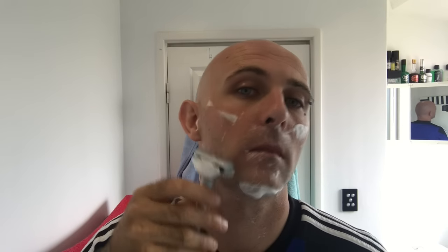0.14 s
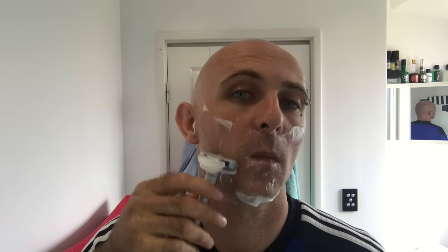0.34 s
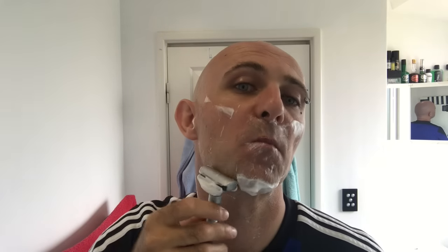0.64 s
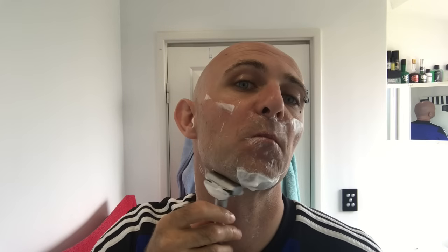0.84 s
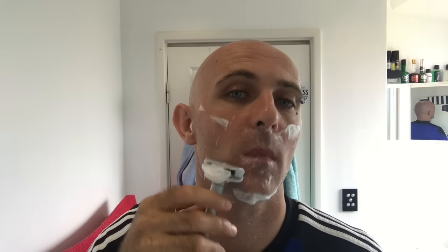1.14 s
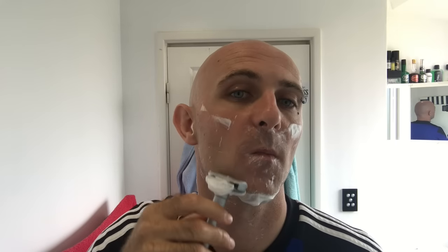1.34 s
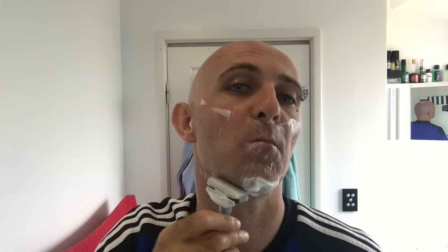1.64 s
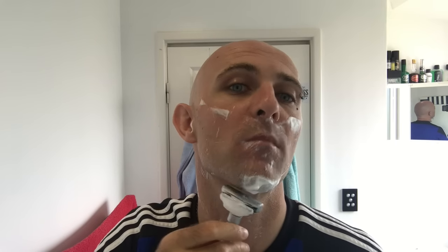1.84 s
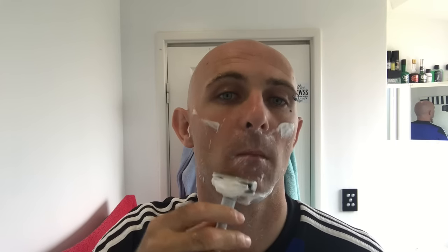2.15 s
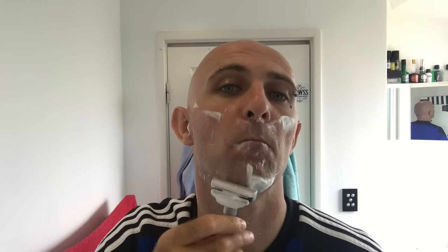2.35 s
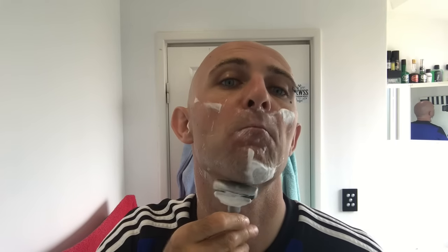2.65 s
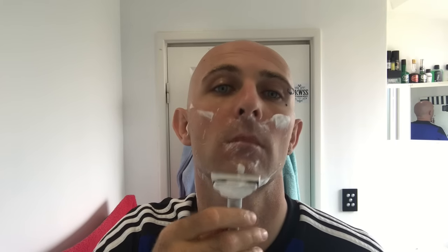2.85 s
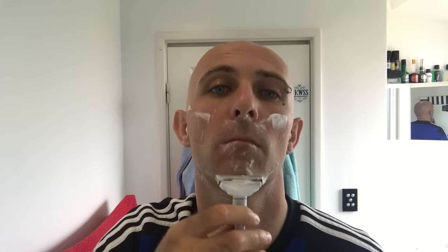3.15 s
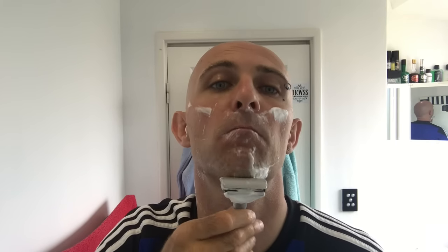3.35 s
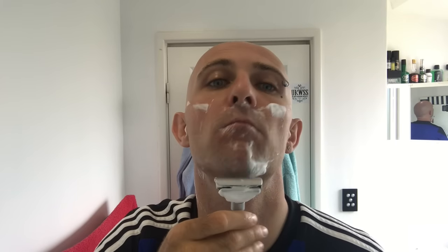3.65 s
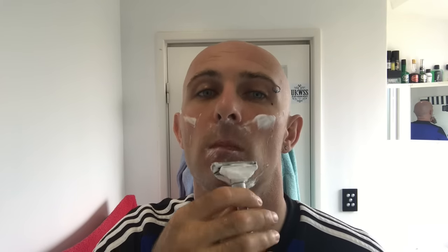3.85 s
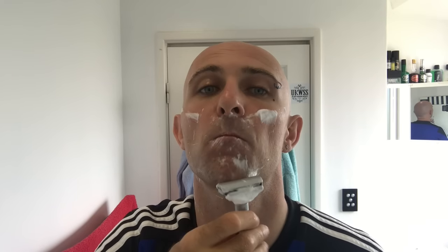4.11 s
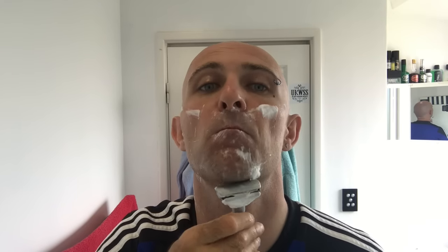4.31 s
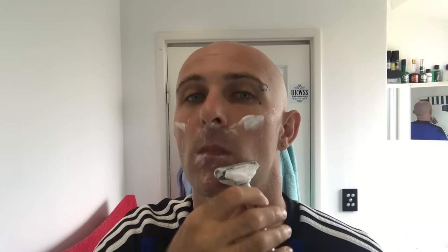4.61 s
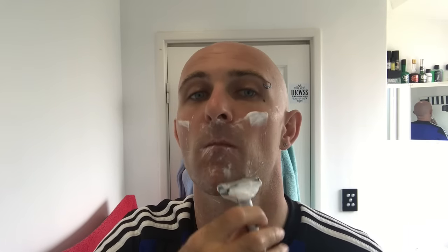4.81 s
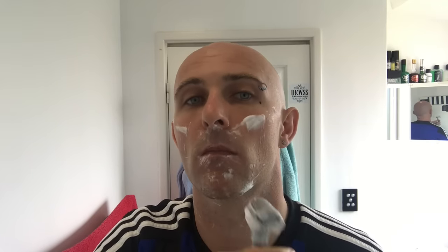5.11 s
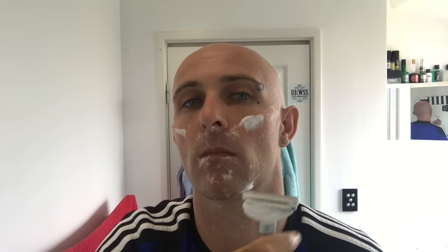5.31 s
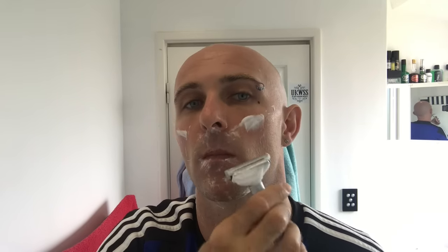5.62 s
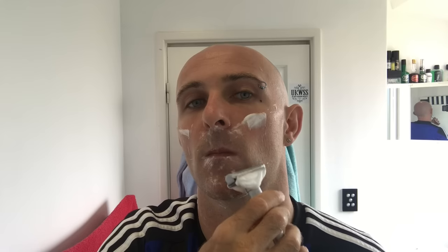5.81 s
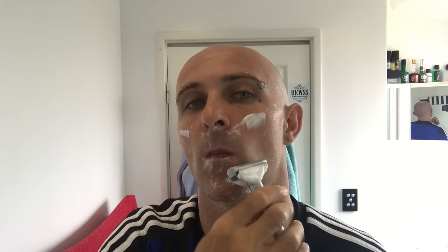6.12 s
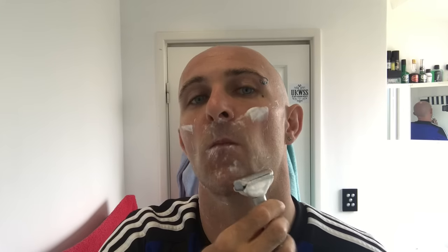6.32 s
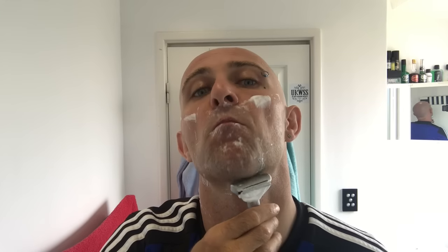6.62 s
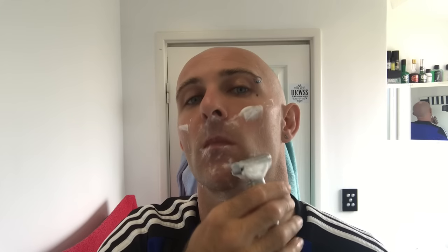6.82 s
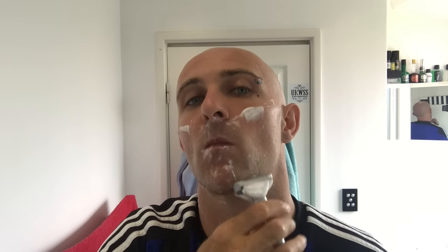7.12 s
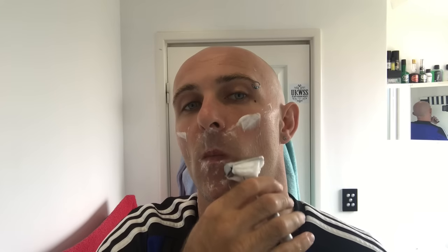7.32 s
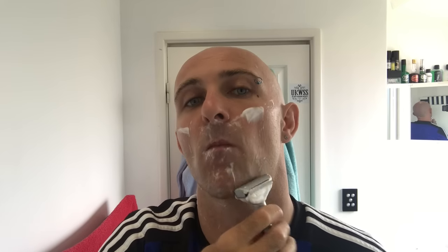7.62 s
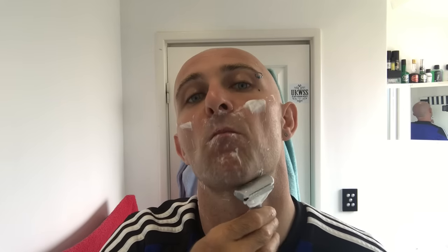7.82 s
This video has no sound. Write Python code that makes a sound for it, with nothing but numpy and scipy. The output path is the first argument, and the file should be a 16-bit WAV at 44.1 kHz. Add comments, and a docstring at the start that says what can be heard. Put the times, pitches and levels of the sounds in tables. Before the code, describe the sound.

A safety razor scrapes through lathered stubble, heard close up in a small room with a short echo. A faint low machine hum, rumble and airy hiss run throughout. Each stroke is a brief, high-pitched, scratchy rasp, with sharp little cracks where tough hairs give way. After a faint scrape at the start, strong crackling strokes come at about 0.7 and 1.5 seconds, a longer one from 2.3 to 2.7, a double one from 3.2 to 3.6, and others near 4.2 and 4.9. Tiny bright foam pops and dry clicks of the head touching or leaving the skin fall around the strokes. Near 5 seconds a soft low boom swells for half a second while the shaving pauses. Strokes return at about 6.0 and 6.5, with a short one at 7.1. The last runs from 7.6 to 7.9, with one brief metallic clink at about 7.7.

```python
"""A low machine hum fills a small room, and a safety razor starts to rasp through lathered stubble.
A man shaves in short strokes from jaw to chin: each hair snaps at the blade, rings the razor head and
thuds softly into the skin. Lather pops as the head lands and lifts, and tough hairs catch, then crack.
A low room mode swells once past the middle, and near the end the razor clinks."""
import sys
import numpy as np
from scipy import signal
from scipy.fft import rfft, irfft, next_fast_len
from scipy.io import wavfile
from scipy.ndimage import uniform_filter1d

SR = 44100
rng = np.random.default_rng(int(sys.argv[2]) if len(sys.argv) > 2 else 0)


def master_out(mix):
    """Clip the mix to full scale and print it as 16-bit PCM to the path in sys.argv[1]."""
    frames = np.transpose(np.atleast_2d(mix))
    ceiling = np.clip(frames, -1, 1)
    pcm = np.round(ceiling * 32767).astype(np.int16)
    wavfile.write(sys.argv[1], SR, pcm)


N = 351036
TIME = np.arange(N) / SR
TOP_HZ = 15780


def gain_of(db):
    """Decibels to amplitude."""
    return 10 ** (np.asarray(db) / 20)


def unit_rms(x):
    """Scales to rms 1."""
    return x / np.sqrt(np.mean(x ** 2) + 1e-20)


def curve_at(points, hz):
    """Reads a curve on a log-frequency axis."""
    f, value = np.transpose(points)
    return np.interp(np.log(hz + 1), np.log(f + 1), value)


def add(mix, s, sound):
    """Mixes a sound in at s seconds."""
    part = mix[max(round(s * SR), 0):][:len(sound)]
    part += sound[:len(part)]


def noise(gain):
    """Noise of rms 1, shaped by a gain that depends on frequency."""
    size = next_fast_len(N, True)
    spectrum = rfft(rng.standard_normal(size)) * gain(np.fft.rfftfreq(size, 1 / SR))
    return unit_rms(irfft(spectrum, size)[:N])


def wander(hz):
    """Smooth random modulation, rolling off above hz."""
    return noise(lambda f: 1 / (1 + (f / hz) ** 4))


def ring(gain, size=2048):
    """Minimum-phase click response of energy 1, from its spectrum."""
    log_gain = np.log(np.maximum(gain(abs(np.fft.fftfreq(size, 1 / SR))), 1e-5))
    response = np.fft.ifft(np.exp(np.conj(signal.hilbert(log_gain)))).real[:size // 2]
    return response / np.linalg.norm(response)


def bursts(events, trail, decay_s, per_s):
    """Each event is one click with a quickly dying trail of smaller ones."""
    clicks, t = np.zeros(N), np.arange(SR // 50) / SR
    for s, db in events:
        crackle = rng.choice([-1, 1], len(t)) * (rng.random(len(t)) < per_s / SR)
        burst = trail * crackle * np.exp(-t / decay_s)
        burst[0] = 1
        add(clicks, s, gain_of(db) * burst)
    return clicks


# Partials of the machine hum: f/Hz, rms level/dB
HUM_PARTIALS = [(45, -62.5), (89.7, -60), (179.5, -76.5), (207, -78.5)]


def machine_hum(waver=0.13, drift_rad=0.27):
    """A machine drones low, each partial wavering in level and phase."""
    hum = np.zeros(N)
    for hz, db in HUM_PARTIALS:
        level = 1 + waver * wander(0.98)
        phase = 2 * np.pi * hz * TIME + drift_rad * wander(0.46)
        hum += gain_of(db) * unit_rms(level * np.sin(phase))
    return hum


# EQ of the room's low rumble: f/Hz, relative level/dB
RUMBLE_EQ = [(15, -30), (28, -15), (36, -19), (52, -10), (66, -3.5), (84, -12.5), (102, 0.5), (116, -5),
             (132, -17), (165, -17.5), (300, -17.5), (420, -23), (800, -28.5), (1500, -46.5)]
# EQ of the room's airy hiss: f/Hz, relative level/dB
HISS_EQ = [(410, -9), (700, -2), (797, -12.5), (907, -1.5), (1180, -2), (1370, -3.5), (1450, -4),
           (1970, -6), (2130, -8), (3680, -8.5), (4890, -12.5), (6680, -11.5), (10500, -25.5), (12400, -22),
           (15500, -45)]


def room_tone(rumble_db=-57.5, hiss_db=-69.5, boom_hz=65.1, rest_db=-63.5, swollen_db=-54):
    """The air rumbles and hisses faintly; a low room mode booms under it and swells once."""
    rumble = gain_of(rumble_db) * noise(lambda f: gain_of(curve_at(RUMBLE_EQ, f)))
    start_s, end_s, fade_s = 4.88, 5.34, 0.091
    swell = np.clip(np.minimum(TIME - start_s, end_s - TIME) / fade_s, 0, 1)
    mode = unit_rms(np.sin(2 * np.pi * boom_hz * TIME + wander(hz=6.3)))
    boom = gain_of(rest_db + (swollen_db - rest_db) * swell) * mode
    hiss = gain_of(hiss_db) * noise(lambda f: gain_of(curve_at(HISS_EQ, f)))
    return rumble + boom + hiss


def pull_envelope(start, crest, lift, db, swell_db, sag_db):
    """One pull: the head grazes the lather, the blade bites, the rasp swells, sags and lifts off."""
    graze_s, graze_db, bite_s, release_db_per_s = 0.03, -16.5, 0.0072, 360
    graze = gain_of(graze_db) * np.clip(2 * (TIME - start) / graze_s + 3.2, 0, 1)
    bite = np.clip((TIME - start) / bite_s + .5, 0, 1)
    swell = swell_db * np.clip((crest - TIME) / max(crest - start, .001), 0, 1)
    sag = sag_db * np.clip((TIME - crest) / max(lift - crest, .001), 0, 1)
    release = release_db_per_s * np.maximum(TIME - lift, 0)
    return np.maximum(graze, bite) * gain_of(db - swell - sag - release)


# Razor pulls, one to three a stroke: start t/s, crest t/s, lift-off t/s, drive level/dB, swell/dB,
# sag/dB, treble trim/dB, guard ring boost/dB, blade ring boost/dB
RAZOR_PULLS = [(0.0, 0.034, 0.026, -55.5, -2, 4, -4, -1, -2.5),
               (0.471, 0.65, .672, -57, 10.5, 3.5, -3.5, -4, 1),
               (0.697, 0.768, 0.88, -43.5, 3, 12, -6, -1, -1),
               (0.894, 1.005, 0.98, -56, 6.5, -11.5, -5, -1, -3),
               (1.383, 1.613, 1.71, -40.5, 21.5, 18, -3.5, -2.5, -1),
               (1.698, 1.785, 1.788, -48.5, 2, 1.5, -4.5, 0.5, -2),
               (2.224, 2.23, 2.28, -60, -3.5, 11, 1, 0, -.5),
               (2.291, 2.515, 2.55, -45.5, 1, 3, -4.5, 0, -1.5),
               (2.58, 2.69, 2.706, -50.5, 1, 1, -1.5, 2, -4.5),
               (3.183, 3.286, 3.346, -47, 4, 3.5, -6, 0.5, 2.5),
               (3.334, 3.34, 3.425, -49, 1, 3, 1.5, 0, -2), (3.444, 3.472, 3.65, -44, 9, 16, 0.5, 5, -6),
               (4.07, 4.125, 4.183, -47, 4.5, -1, -5, 4, 1.5),
               (4.201, 4.246, 4.434, -43, 2.5, 12.5, -5.5, 0, -11),
               (4.823, 4.84, 4.885, -51.5, 2, 0, -18, -0.5, -1),
               (4.888, 4.937, 4.95, -40.5, 13.5, 4, -6.5, 0, -4.5),
               (5.954, 6.004, 6.07, -46.5, 12.5, 16.5, -1, 2.5, 1),
               (6.345, 6.389, 6.455, -49, 5.5, 1.5, -1, 1.5, 0),
               (6.454, 6.52, 6.635, -44.5, 2, 3, 0, 1, -1),
               (7.098, 7.13, 7.178, -45, 1.5, 11, -5, -2.5, 0.5),
               (7.468, 7.657, 7.78, -51, 15.5, 12.5, -9, -3, -2),
               (7.752, 7.846, 7.935, -46, 5, 7.5, -4.5, -0.5, -0.5)]


def rasp_envelope():
    """The strongest pull at each moment drives the rasp."""
    return np.max([pull_envelope(*row[:6]) for row in RAZOR_PULLS], axis=0)


def grip(glide_s=0.063):
    """The grip sets treble, guard ring and blade ring in dB, gliding from pull to pull."""
    start, _, _, _, _, _, *colours_db = np.transpose(RAZOR_PULLS)
    pull_now = np.maximum(np.searchsorted(start - glide_s / 2, TIME) - 1, 0)
    return [uniform_filter1d(db[pull_now], int(glide_s * SR)) for db in colours_db]


# The razor's path over the face: t/s, position (0 jaw, 1 chin)
RAZOR_PATH = [(0, .1), (2.4, 0.12), (3.3, 0.39), (3.5, 0.46), (4.1, 0.76), (6.4, 0.71), (6.6, 1)]


def chin_share():
    """How far the razor has travelled from jaw to chin."""
    return np.interp(TIME, *np.transpose(RAZOR_PATH))


def stubble(jaw_hairs_per_s=1300, chin_hairs_per_s=2400, slide=0.4, crossover_hz=9500):
    """The blade cuts hairs in clumps, more on a stronger stroke, over a faint slide on the skin."""
    envelope = rasp_envelope()
    hairs_per_s = np.interp(chin_share(), [0, 1], [jaw_hairs_per_s, chin_hairs_per_s])
    cuts_per_s = hairs_per_s * (envelope / envelope.max()) ** .55 + 80
    thickness_db = 1.5 * np.minimum(rng.exponential(1, N), 3.5)
    clump_db = 1.5 * wander(hz=100)
    cuts = gain_of(thickness_db + clump_db) * rng.choice([-1, 1], N) * (rng.random(N) < cuts_per_s / SR)
    cuts /= np.sqrt(abs(uniform_filter1d(cuts ** 2, size=1800)) + 1e-4)  # the hand keeps a steady pull
    force = envelope * blade_stall() * (cuts + slide * rng.standard_normal(N))
    treble = gain_of(grip()[0] + 2.5)
    sparkle = unit_rms(gain_of(4 * np.clip(rng.standard_normal(N), -2, 2)))  # cleaner cuts are brighter
    low, high = (signal.butter(2, crossover_hz, kind, fs=SR, output="sos") for kind in ("low", "high"))
    return signal.sosfiltfilt(low, force) + signal.sosfiltfilt(high, force * treble * sparkle)


# Resonances of the razor head: f/Hz, width/Hz, boost/dB
HEAD_RESONANCES = [(2370, 110, 3), (2590, 310, -6.5), (3200, 180, -1), (3540, 150, 4), (4120, 400, 2),
                   (4480, 230, 3.5), (4790, 650, -2), (5600, 240, 2.5), (6260, 270, 6), (6720, 220, 2.5),
                   (7260, 150, 2), (10420, 590, -7.5)]
# EQ of a hair cut on the side of the jaw: f/Hz, relative level/dB
JAW_EQ = [(710, -55), (1200, -30), (2090, -13.5), (2270, -6.5), (2710, -11), (3510, -2.5), (4310, 0.5),
          (4800, -5), (6510, -0.5), (7570, -3.5), (9210, -5), (10500, -9), (12500, -7), (14200, -1),
          (16000, -34)]
# EQ of a hair cut on the chin: f/Hz, relative level/dB
CHIN_EQ = [(710, -28), (1200, -38), (1410, -16.5), (1520, -20), (2060, -10.5), (2350, -8), (2620, -6.5),
           (3320, 0.5), (3620, -7.5), (4310, -6.5), (4800, -7), (6950, -5.5), (10500, -4.5), (14200, -2),
           (16000, -0.5)]
# EQ of the skin's soft thud under a cut: f/Hz, relative level/dB
SKIN_EQ = [(150, -40), (500, -33), (900, -17.5), (1400, -24.5), (2500, -46), (5000, -54)]
# Rings that the grip frees or damps, guard then blade: f/Hz, width/Hz
GRIP_RINGS = [(3450, 1400), (6300, 1800)]


def razor_head(clicks, cutoff_hz=15900, detune=0.037, ripple_db=2.0, hop_s=.005, spots=7):
    """Clicks ring the head and thud into the skin; each spot along the blade has its own colour."""
    hz = np.fft.rfftfreq(2048, 1 / SR)
    chin = chin_share()
    # the cutting hops at random along the edge
    spot_now = rng.integers(0, spots, N)[np.cumsum(rng.random(N) < 1 / (hop_s * SR))]
    ripples = uniform_filter1d(uniform_filter1d(rng.standard_normal((spots, len(hz))), 50), 40)
    ripples = np.array([unit_rms(row) for row in ripples])
    ripples -= ripples.mean(axis=0)
    thud = gain_of(curve_at(SKIN_EQ, hz))
    rolloff = np.sqrt(1 + (hz / cutoff_hz) ** 40)
    sound = np.zeros(N)
    for spot, tune in enumerate(1 + detune * np.linspace(-1, 1, spots)):
        head_db = ripple_db * ripples[spot]
        for centre, width, db in HEAD_RESONANCES:
            head_db += db / (1 + (2 * (hz - centre * tune) / width) ** 2)
        for eq, share in [(JAW_EQ, 1 - chin), (CHIN_EQ, chin)]:
            cut = gain_of(curve_at(eq, np.minimum(hz, 14500)) + head_db)
            response = ring(lambda f: np.interp(f, hz, (cut + thud) / rolloff))
            sound += signal.oaconvolve(clicks * share * (spot_now == spot), response)[:N]
    for (centre, width), boost_db in zip(GRIP_RINGS, grip()[1:]):
        band = signal.lfilter(*signal.iirpeak(centre, centre / width, SR), sound)
        sound += (gain_of(boost_db) - 1) * band
    return sound


# Cues for the lather pops: t/s, relative level/dB
LATHER_POPS = [(.512, -38), (.561, -36), (.6505, -34), (1.0507, -37.5), (1.4267, -38), (1.442, -48),
               (1.899, -49), (2.2318, -33), (3.186, -35), (3.6905, -40), (4.005, -48), (4.827, -33.5),
               (5.219, -48), (6.293, -43), (6.35, -45), (6.493, -27), (7.0687, -32.5), (7.8988, -34)]
# EQ of a bursting film of foam: f/Hz, relative level/dB
POP_EQ = [(500, -33), (2500, -26), (4000, -17.5), (6500, -8.5), (10400, -16), (13000, -8), (16000, -2)]


def lather(trim_db=1, ticks_per_s=35):
    """Foam films burst brightly and set off tiny bubbles; small ones break under the moving head."""
    pop = ring(lambda f: gain_of(curve_at(POP_EQ, f)) / np.sqrt(1 + (f / TOP_HZ) ** 40))
    films = bursts(LATHER_POPS, trail=0.2, decay_s=0.0027, per_s=4900)
    ticks = rng.random(N) < ticks_per_s / SR
    over_rasp_db = 7 + 1.5 * np.minimum(rng.exponential(1, N), 3)
    small_films = ticks * gain_of(over_rasp_db) * rasp_envelope()
    return gain_of(trim_db) * signal.oaconvolve(films + small_films, pop / abs(pop).max())[:N]


# Cues for the head landing or lifting: t/s, drive level/dB
SKIN_TAPS = [(.512, -34), (1.428, -33), (2.081, -48), (2.2315, -33.5), (3.125, -42.5), (3.169, -32),
             (4.069, -37), (4.505, -33.5), (4.816, -31.5), (5.9205, -33), (6.7125, -33.5), (7.07, -31)]


def skin_taps():
    """The head touches or leaves the skin with a short, dry click."""
    return bursts(SKIN_TAPS, trail=0.28, decay_s=0.0019, per_s=9800)


# Cues for the toughest hairs: t/s, drive level/dB
HAIR_SNAPS = [(0.6516, -30), (0.678, -29), (0.7072, -23.5), (0.7607, -21), (0.7744, -26), (0.7925, -25),
              (1.4903, -26), (1.5452, -24.5), (1.5664, -20.5), (1.5987, -21.5), (1.6112, -23.5),
              (1.712, -32), (2.2966, -31), (2.372, -33), (2.407, -22.5), (2.4573, -27), (2.5226, -25),
              (2.61, -27), (3.22, -29.5), (3.244, -28.5), (3.2914, -25), (3.3188, -23.5), (3.4368, -26.5),
              (4.113, -29), (4.1279, -28), (6.4404, -28), (6.46, -25.5), (7.8296, -25), (7.898, -29.5)]


def hair_snaps():
    """A tough hair lets go with a crack and its neighbours follow."""
    return bursts(HAIR_SNAPS, trail=0.47, decay_s=0.004, per_s=6000)


def blade_stall(depth=0.68, hang_s=0.0112):
    """The blade hangs on each tough hair, ducking the rasp just before the snap."""
    speed = np.ones(N)
    for s, _ in HAIR_SNAPS:
        add(speed, s - hang_s, -depth * np.hanning(int(hang_s * SR)) ** .5)
    return np.maximum(speed, 0)


# Knocks on the razor head: t/s, peak level/dB
HEAD_KNOCKS = [(7.7377, -34), (7.7465, -41)]
# Modes of the knocked head: f/Hz, relative level/dB, t60/s
KNOCK_MODES = [(2434, 3, 0.039), (2536, 1, 0.045), (2990, -13, 0.068), (3370, -11, 0.045),
               (3820, -6, 0.019)]


def clink(rise_s=0.00033):
    """Two knocks in quick succession ring the razor head as one brief clink."""
    out, t = np.zeros(N), np.arange(SR // 4) / SR
    tone = sum(gain_of(db - 60 * t / t60) * np.sin(2 * np.pi * (hz * t + rng.random()))
               for hz, db, t60 in KNOCK_MODES)
    tone *= 1 - np.exp(-(t / rise_s) ** 2)
    for s, db in HEAD_KNOCKS:
        add(out, s, gain_of(db) * tone / abs(tone).max())
    return out


# Reverb time of the small room: f/Hz, t60/s
ROOM_DECAY = [(500, 0.78), (3000, 0.23), (8000, 0.23), (15000, 0.13)]


def echoes(x, early_db=-8, tail_db=-7, early_s=.012):
    """Near walls throw back a few single echoes and a short, dense tail."""
    size = SR // 2
    taps = rng.choice([-1., 1.], size) * (rng.random(size) < 4000 / SR) * (TIME[:size] > .004)
    hz, t, bands = signal.stft(taps, SR, nperseg=256)
    decay = gain_of(-60 * t / curve_at(ROOM_DECAY, hz)[:, None])
    tail = signal.istft(bands * decay, SR, nperseg=256)[1][:size]
    response = gain_of(tail_db) * tail / np.linalg.norm(tail)
    delays = rng.uniform(.001, early_s, size=8)
    for s in delays:
        add(response, s, gain_of([early_db]) / np.sqrt(len(delays)))
    return signal.oaconvolve(x, response)[:N]


def scene(sway_hz=2.7, poses=5):
    """The shave over hum and room tone; the echoes crossfade as hand and head move."""
    shave = razor_head(stubble() + hair_snaps() + skin_taps()) + lather() + clink()
    pose_phases = np.arange(poses)[:, None] / poses
    sends = np.maximum(np.cos(2 * np.pi * (sway_hz * TIME - pose_phases)), 0) ** 3
    sends /= np.linalg.norm(sends, axis=0)  # equal power
    reverb = sum(echoes(shave * send) for send in sends)
    return (shave + reverb + machine_hum() + room_tone())[None]


def record(dry):
    """A steep low-pass trims the very top of the mix."""
    lowpass = signal.firwin(511, TOP_HZ, window=("kaiser", 9), fs=SR)
    return signal.oaconvolve(dry, lowpass[None], "same")


dry = scene()
out = record(dry)
master_out(out)
```